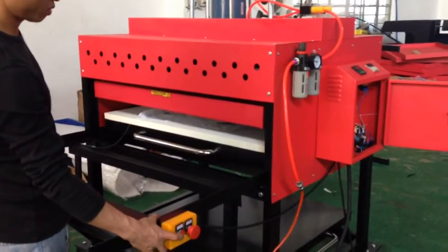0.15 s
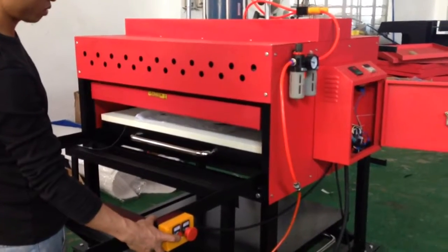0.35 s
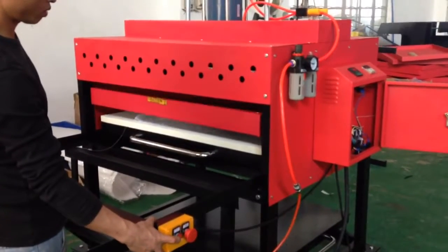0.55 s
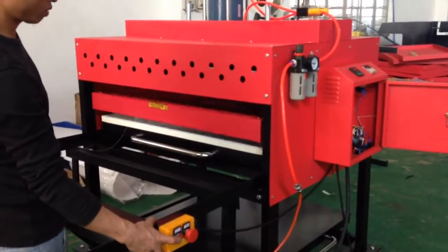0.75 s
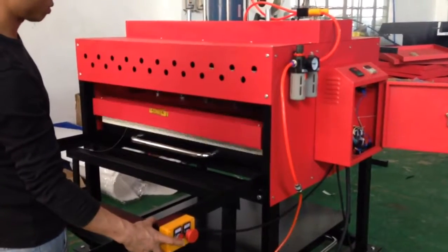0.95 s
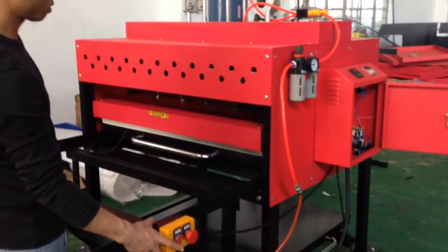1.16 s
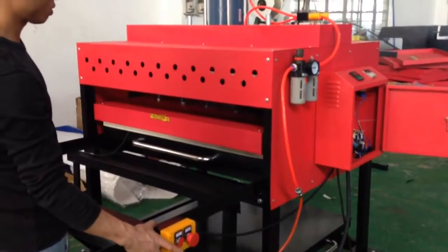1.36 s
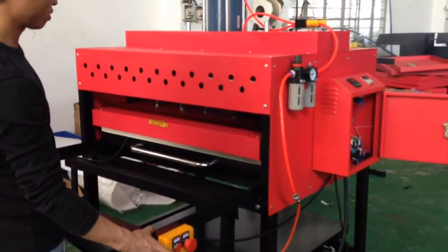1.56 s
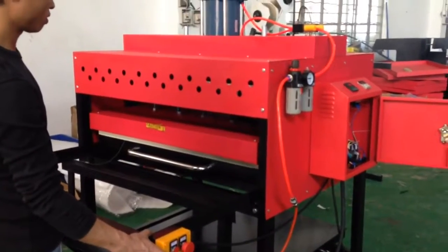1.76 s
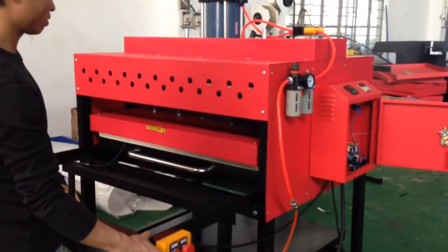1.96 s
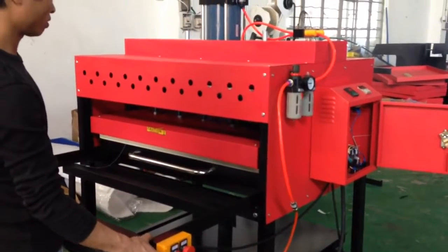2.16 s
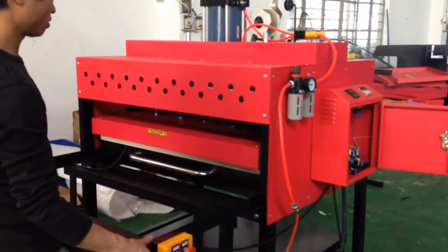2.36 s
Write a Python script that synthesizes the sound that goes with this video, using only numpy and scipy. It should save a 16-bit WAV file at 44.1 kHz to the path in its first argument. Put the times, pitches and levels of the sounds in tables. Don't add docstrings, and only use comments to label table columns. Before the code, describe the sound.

A loud air release from a press lasts about one second in a reverberant workshop, preceded by a click and followed by fading echo and tiny distant ticks, over a faint leak and machine hum, phone microphone.

```python
import sys
import numpy as np
from scipy import signal
from scipy.io import wavfile
from scipy.ndimage import uniform_filter1d

SR = 44100
rng = np.random.default_rng(int(sys.argv[2]) if len(sys.argv) > 2 else 0)


def inscribe(sig):
    pcm = np.round(np.clip(np.atleast_2d(sig).T, -1, 1) * 32767)
    wavfile.write(sys.argv[1], SR, pcm.astype(np.int16))


def to_linear_factor(level_db):
    exponent = np.asarray(level_db, float) / 20
    return 10 ** exponent


N = 105840
T = np.arange(N) / SR
VALVE_OPENS_S = 0.2292

# (time [s], level [dB], dullness [0-1])
JET_FADE = [
    (.23, -23, 0.63),
    (.3, -22, 0.51),
    (.37, -23.5, 0.55),
    (.6, -23.5, 0.61),
    (.85, -25.5, 0.79),
    (1.15, -28, 0.92),
    (1.299, -33, 0.87),
    (1.4, -46.5, 0.78),
    (1.7, -72, 1.1),
]
# (frequency [Hz], level [dB per Hz])
JET_BRIGHT = [(150, -36), (480, -8), (1020, -15.5), (2410, -11.5), (4480, -4), (7500, 5), (13000, -4.5),
              (15500, 3.5)]
# (frequency [Hz], level [dB per Hz])
JET_DULL = [(150, -41), (600, -18), (1000, -13.5), (1700, -8), (2900, -3), (5500, -0.5), (7500, -12),
            (15500, -24.5)]
# (frequency [Hz], width [Hz], level [dB])
CASING = [(603, 49, -19), (1027, 81, 8.5), (1180, 94, -6), (1270, 60, 5), (1570, 170, 6), (1820, 36, 8),
          (2033, 50, 7.5), (2270, 42, 3), (2486, 170, 1.5), (2905, 480, -2), (7360, 2300, 0),
          (9990, 1550, 7.5), (10900, 770, -3.5), (12820, 2300, 9), (14600, 720, 4.5)]
# (frequency [Hz], width [Hz], level [dB])
DULL_DIPS = [(14150, 450, -3), (10950, 350, -1)]
# (time [s], level [dB], pitch [Hz], width [Hz])
CHUFF = [
    (.2298, -22, 4300, 1500),
    (.2315, -28, 4100, 1500),
    (.236, -43, 3000, 1500),
    (.245, -60, 2000, 1500),
]
# (start [s], level [dB], pitch [Hz], time to fall 60 dB [s])
PIPE_RINGS = [
    (.232, -33, 1040, .15),
    (.233, -32, 1530, .15),
    (.236, -34, 1810, .1),
    (.247, -34, 2040, .12),
    (.276, -34, 1530, .2),
]
# (time [s], level [dB], favoured pitch [Hz])
HOWL = [
    (.3, -44, 4600),
    (.38, -32, 4360),
    (.46, -19.5, 3990),
    (.55, -20, 4100),
    (0.649, -19, 3880),
    (.9, -19, 3890),
    (1.1, -30.5, 3950),
    (1.2, -24, 4400),
    (1.32, -29.5, 3850),
    (1.55, -68, 3890),
]
# (frequency [Hz], width [Hz], level [dB])
SILENCER_MODES = [(3540, 69, -11), (3774, 180, -9.5), (3957, 120, -9), (4250, 300, -7), (4560, 84, -9),
                  (4960, 500, -4.5), (5800, 750, 0), (6300, 300, 7)]
# (time [s], level [dB], pitch [Hz], width [Hz])
WHISTLE = [
    (.45, -37.5, 3290, 200),
    (.6, -36.5, 3250, 130),
    (.8, -31.5, 3307, 150),
    (.95, -28, 3320, 190),
    (1.1, -30.5, 3190, 199.4),
    (1.205, -30, 3160, 197),
    (1.23, -35.5, 3120, 400),
    (1.36, -42, 3240, 395),
    (1.75, -61.5, 2880, 600),
]
# (time [s], level [dB], pitch [Hz], width [Hz])
WHEEZE = [
    (1.2, -32, 2930, 400),
    (1.26, -39.5, 2500, 500),
    (1.32, -37, 2010, 610),
    (1.39, -39, 1890, 600),
    (1.45, -44.5, 1250, 1008),
    (1.53, -52, 980, 300),
    (1.57, -63, 950, 300),
]
# (start [s], length [s], level [dB], pitch [Hz])
GROANS = [(0.557, 0.1, -49, 420), (0.599, 0.15, -54, 266.6), (0.702, 0.089, -48.5, 420),
          (0.931, 0.21, -58, 420), (1.165, 0.033, -43.5, 420), (1.209, 0.036, -53.5, 364),
          (1.266, 0.029, -50.5, 430), (1.179, 0.047, -39.5, 85), (1.222, 0.06, -46.5, 94.4),
          (1.289, 0.041, -47, 92.5), (1.399, 0.1, -57.5, 101)]
# (time [s], level [dB], pitch [Hz], width [Hz])
SCRAPE = [
    (1.16, -103, 360, 300),
    (1.2, -56, 300, 300),
    (1.31, -52, 347, 300),
    (1.34, -68, 300, 300),
]
# (time [s], burst length [s], burst level [dB], ring level [dB])
KNOCKS = [
    (0.1657, 0.008, -35, -45),
    (0.173, 0.0093, -42, -51),
    (0.185, 0.0067, -70, -46),
    (.2, 0.0068, -70, -47.5),
    (0.2267, 0.004, -44, -40),
]
# (frequency [Hz], level [dB], time to fall 60 dB [s])
FRAME_MODES = [(58, 12, 0.12), (202, 2, 0.2), (300, -6.5, 0.54), (328, 4, 0.32), (420, 1.5, 0.4),
               (615, 4, 0.19), (720, 4, 0.12), (850, -1, 0.16), (1135, 12, 0.093), (1380, 1, 0.12),
               (1660, -2, 0.29), (2060, -6, 0.38), (2500, -18, .12), (3000, -18, .12)]
# (time [s], level [dB], pitch [Hz])
TICKS = [
    (1.937, -43.5, 1790),
    (2.15, -52, 12500),
    (2.237, -48, 2070),
    (2.25, -52, 12500),
    (2.25, -54, 5000),
    (2.318, -52, 1420),
]
# (frequency [Hz], level [dB per Hz])
SHOP_TONE = [(25, -20), (64, -3), (340, -9), (600, -18), (1240, -20), (2800, -19.5), (11500, -18.5),
             (15000, -9.5)]
# (time [s], level [dB])
SHOP_LEVEL = [(0, -47.5), (.2, -46), (1.8, -49), (2.4, -48)]
# (frequency [Hz], width [Hz], level [dB])
LEAK = [(3840, 620, 12.5), (3730, 60, -7), (5100, 990, 9.5), (5540, 170, 0), (8400, 610, 5.5),
        (9450, 1100, 4), (6900, 670, 1)]
# (frequency [Hz], level [dB], width [Hz])
HUM = [(68.8, -64, 20), (101, -66, 5.2), (185.5, -65, 3.3), (313, -73.5, 0.85), (353, -69.5, 1.14)]
# (frequency [Hz], time to fall 60 dB [s])
HALL_DECAY = [(200, 2.9), (1000, 1.39), (2500, 1.17), (5000, 0.86), (10000, 0.65), (15000, 0.69)]
# (from [Hz], to [Hz], start [s], end
# [s], share lost at start [0-1], share lost at end [0-1])
THIN_BANDS = [(13550, 14900, .26, 1.5, .2, .5), (13950, 14400, .7, 1.36, .2, .8),
              (10350, 11400, .3, 1.46, .2, .35), (10850, 11200, 1.37, 1.44, .9, .9)]


def evened(x):
    return x / np.sqrt(np.mean(x ** 2) + 1e-20)


def read(points, hz):
    f, value = np.transpose(points)
    return np.interp(np.log(hz + 1), np.log(f + 1), value)


def bumps(rows, hz):
    return sum(db * np.exp(-2 * ((hz - f) / width) ** 2) for f, width, db in rows)


def add(mix, s, sound):
    part = mix[round(s * SR):][:len(sound)]
    part += sound[:len(part)]


def resonate(x, hz, width):
    turn = np.exp(2j * np.pi * np.cumsum(hz * np.ones(len(x))) / SR)
    r = np.exp(-np.pi * width / SR)
    return 2 * (turn * signal.lfilter([1 - r], [1, -r], x / turn)).real


def resonate_twice(x, hz, width):
    return evened(resonate(resonate(x, hz, width), hz, 2 * width))


def wander(rate):
    span = max(int(SR / rate), 1)
    return evened(uniform_filter1d(uniform_filter1d(rng.standard_normal(N), span), span))


def turbulence(shape_db, patch_db):
    frames = N // 256 + 5
    hz = np.fft.rfftfreq(1024, 1 / SR)[:, None]
    a, b, patches = rng.standard_normal((frames, 513, 3)).T
    patches = uniform_filter1d(uniform_filter1d(patches, size=12, axis=0), size=12, axis=1)
    shape = to_linear_factor(shape_db(hz, np.arange(frames) * 256 / SR)) * np.ones(frames)
    shape = shape / np.sqrt((shape ** 2).mean(0))
    z = (a + 1j * b) * shape * to_linear_factor(patch_db * evened(patches))
    return evened(signal.istft(z, nperseg=1024, noverlap=768)[1][:N])


def breathy(curve, waver_db):
    s, level_db, pitch_hz, width_hz = np.transpose(curve)
    on = (T > s[0]) & (T < s[-1])
    out, noise = np.zeros(N), rng.standard_normal((len(s), N))
    hz = np.interp(T[on], s, pitch_hz)
    for share, width, n in zip(np.eye(len(s)), width_hz, noise):
        out[on] += np.sqrt(np.interp(T[on], s, share)) * resonate_twice(n[on], hz, width)
    return out * to_linear_factor(np.interp(T, s, level_db) + waver_db * wander(49))


def jet():
    rise_s, treble_lag_s = 0.002, 0.007
    patch_db, flutter_db = 1.5, 0.57
    s, level_db, dullness = np.transpose(JET_FADE)

    def shape_db(hz, t):
        d = np.interp(t, s, dullness)
        blend = (1 - d) * read(JET_BRIGHT, hz) + d * read(JET_DULL, hz)
        return blend + bumps(CASING, hz) + d * bumps(DULL_DIPS, hz)

    hiss = turbulence(shape_db, patch_db)
    hiss = hiss * to_linear_factor(np.interp(T, s, level_db) + flutter_db * wander(52))
    low = signal.sosfilt(signal.butter(4, 6000, fs=SR, output="sos"), hiss)
    late = np.clip((T - VALVE_OPENS_S) / treble_lag_s, 0, 1) ** 2
    opening = np.clip((T - VALVE_OPENS_S) / rise_s, 0, 1)
    return opening * ((1 - late) * low + late * hiss)


def howl():
    spread_hz, waver_db = 1300, 1.8
    sag = 0.053
    s, level_db, pitch_hz = np.transpose(HOWL)
    favoured = np.interp(T, s, pitch_hz)
    out = np.zeros(N)
    for hz, width, db in SILENCER_MODES:
        bent = hz * (1 + sag * (favoured - 3700) / 1000)
        mode = resonate_twice(rng.standard_normal(N), bent, width)
        distance_db = 10 * ((hz - favoured) / spread_hz) ** 2
        out += mode * to_linear_factor(db - distance_db + waver_db * wander(36))
    on = (T > s[0]) * (T < s[-1])
    return on * out / 2 * to_linear_factor(np.interp(T, s, level_db))


def whistle():
    return breathy(WHISTLE, 1.5)


def chuff():
    return breathy(CHUFF, 2.3)


def pipe():
    width_hz, rise_s = 45, 0.006
    out, t = np.zeros(N), np.arange(8000) / SR
    for s, db, hz, t60 in PIPE_RINGS:
        ring = evened(resonate(rng.standard_normal(len(t)), hz, width_hz))
        add(out, s, to_linear_factor(db - 60 * t / t60) * np.minimum(t / rise_s, 1) * ring)
    return out


def wheeze():
    return breathy(WHEEZE, 0.61)


def platen():
    edge_s, roughness, pitch_slip = 0.01, 0.3, 0.015
    out = np.zeros(N)
    shake, slip = wander(48), wander(56)
    for start, length, db, hz in GROANS:
        t = np.arange(0, length, 1 / SR)
        first = round(start * SR)
        at = slice(first, first + len(t))
        edge = np.clip(np.minimum(t, length - t) / edge_s, 0, 1)
        tone = np.sin(2 * np.pi * np.cumsum(hz * (1 + pitch_slip * slip[at])) / SR)
        add(out, start, to_linear_factor(db + 3.5) * edge * (1 + roughness * shake[at]) * tone)
    return out


def scrape():
    return breathy(SCRAPE, 2.3)


def knocks():
    width_share, rise_s, top_hz = 0.1, 0.008, 12500
    out, t = np.zeros(N), np.arange(12000) / SR
    for s, length, burst_db, ring_db in KNOCKS:
        n = rng.standard_normal(len(t))
        burst = n * np.sqrt(np.sin(np.pi * np.clip(t / length, 0, 1)).clip(0))
        burst = burst - 0.27 * np.roll(burst, 1)
        burst = signal.lfilter(*signal.butter(2, top_hz, fs=SR), burst)
        ring = np.zeros(len(t))
        for hz, db, t60 in FRAME_MODES:
            ring += to_linear_factor(db - 60 * t / t60) * resonate_twice(n, hz, width_share * hz)
        add(out, s, to_linear_factor(burst_db) * burst + to_linear_factor(ring_db) * np.minimum(t / rise_s, 1) * ring / 2)
    return out


def far_ticks():
    out, t = np.zeros(N), np.arange(800) / SR
    for s, db, hz in TICKS:
        tick = evened(resonate(rng.standard_normal(len(t)), hz, 1800))
        add(out, s, to_linear_factor(db) * tick * np.exp(-t / 0.0021))
    return out


def shop():
    patch_db, flutter_db, flutter_rate = 1.1, 0.7, 35

    def shape_db(hz, t):
        return read(SHOP_TONE, hz) + np.where(t < VALVE_OPENS_S, 1.3, 1) * bumps(LEAK, hz)

    wash = turbulence(shape_db, patch_db)
    level_db = np.interp(T, *np.transpose(SHOP_LEVEL))
    out = wash * to_linear_factor(level_db + flutter_db * wander(flutter_rate))
    for hz, db, width in HUM:
        loudness = to_linear_factor(db + 1.5 + 1.16 * wander(6.5))
        out += loudness * np.sin(2 * np.pi * np.cumsum(hz + width / 2 * wander(15)) / SR)
    return out


def hall(x):
    delay_s = 0.012
    taps = rng.standard_normal(SR) * (np.arange(SR) > delay_s * SR)
    hz, t, z = signal.stft(taps, SR, nperseg=256)
    fade = to_linear_factor(-60 * t / read(HALL_DECAY, hz)[:, None])
    tail = signal.istft(z * fade, SR, nperseg=256)[1]
    return signal.fftconvolve(x, tail / np.linalg.norm(tail))[:N]


def thin_treble(x):
    hz, t, z = signal.stft(x, SR, nperseg=1024, noverlap=768)
    power = uniform_filter1d(uniform_filter1d(abs(z) ** 2, size=3, axis=0), size=4, axis=1)
    power = power / uniform_filter1d(power, size=40, axis=1)
    keep = np.ones(z.shape)
    for lo_hz, hi_hz, start, end, first, last in THIN_BANDS:
        rows = (hz > lo_hz) & (hz < hi_hz)
        rank = power[rows].argsort(0).argsort(0) / rows.sum()
        flicker = 1 + 0.4 * np.interp(t, T, wander(20))
        share = np.interp(t, [start, end], [first, last], 0, 0) * flicker
        keep[rows] *= rank >= share
    return signal.istft(z * keep, SR, nperseg=1024, noverlap=768)[1][:N]


def scene():
    air = jet() + howl() + chuff() + pipe()
    tone = whistle()
    hits = knocks() + far_ticks()
    near = wheeze() + scrape() + platen()
    echo = hall(air + to_linear_factor(-9) * tone + 0.22 * hits + 0.26 * near)
    mono = air + tone + hits + near + to_linear_factor(-6) * echo + shop()
    return np.array([mono, mono])


def low_pass(x):
    return signal.sosfilt(signal.butter(12, 16430, fs=SR, output="sos"), x)


def record(dry):
    bass_hz, top_hz = 48, 15330
    no_bass = signal.sosfilt(signal.butter(2, bass_hz, "high", fs=SR, output="sos"), dry[0])
    thin = thin_treble(no_bass)
    limited = signal.oaconvolve(thin, signal.firwin(801, top_hz, window=("kaiser", 9), fs=SR), "same")
    return low_pass(np.array([limited, limited]))


dry = scene()
out = record(dry)
inscribe(out)
```